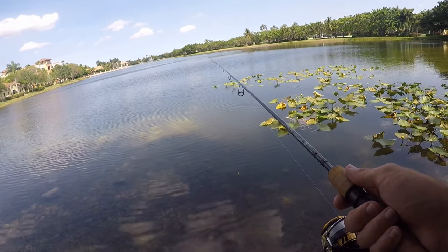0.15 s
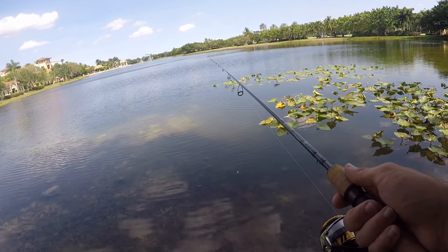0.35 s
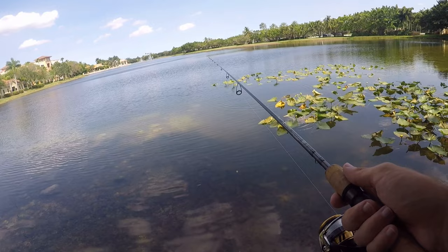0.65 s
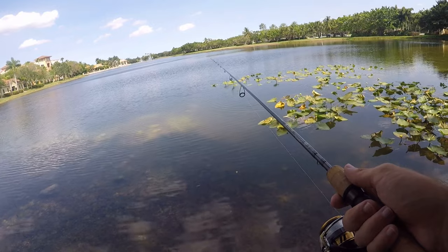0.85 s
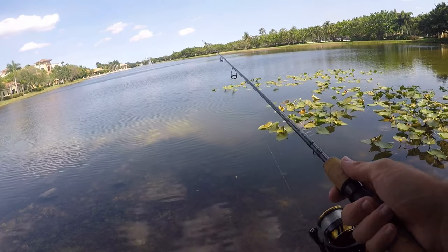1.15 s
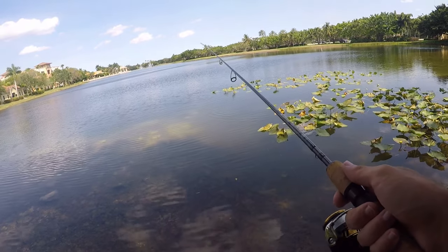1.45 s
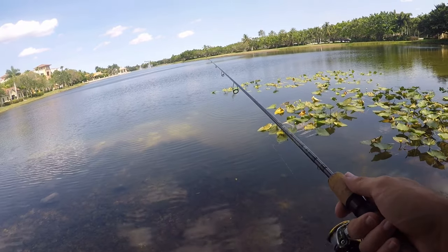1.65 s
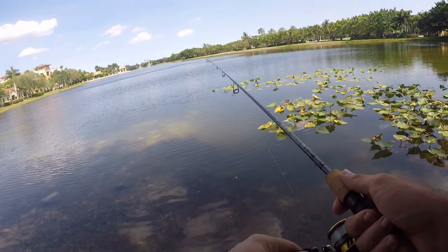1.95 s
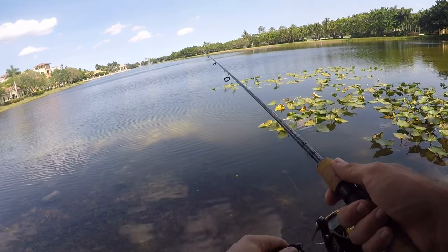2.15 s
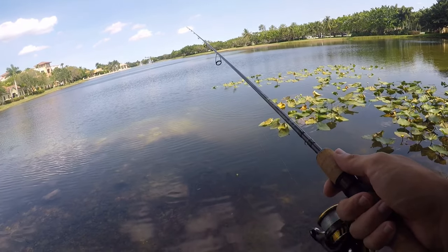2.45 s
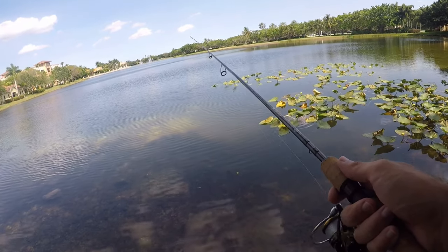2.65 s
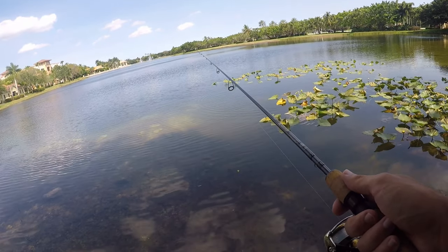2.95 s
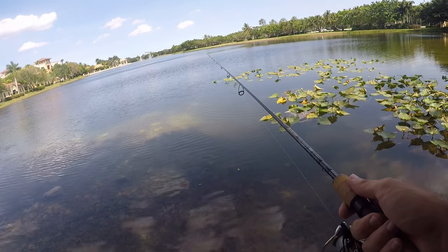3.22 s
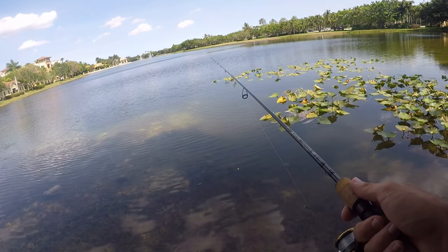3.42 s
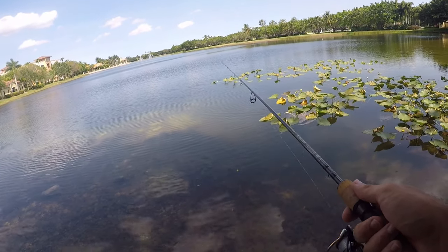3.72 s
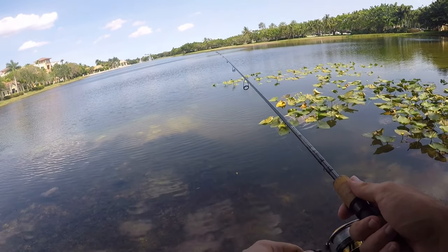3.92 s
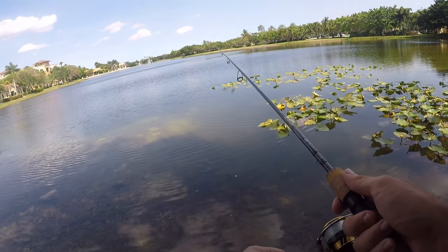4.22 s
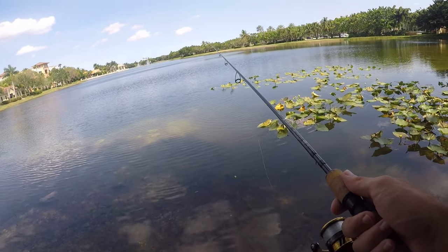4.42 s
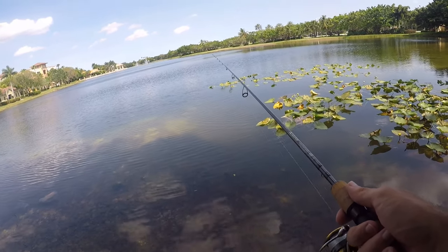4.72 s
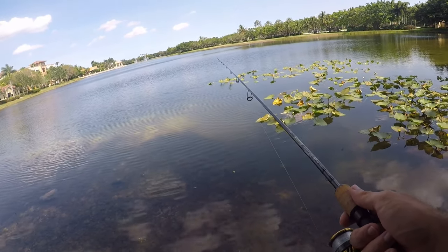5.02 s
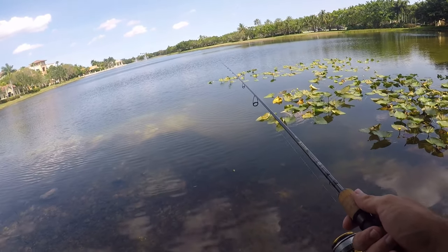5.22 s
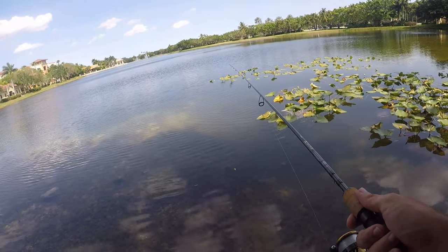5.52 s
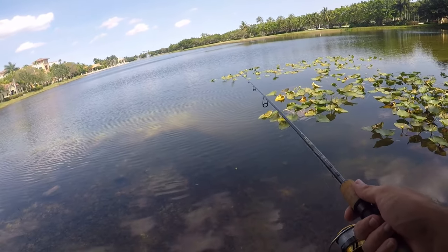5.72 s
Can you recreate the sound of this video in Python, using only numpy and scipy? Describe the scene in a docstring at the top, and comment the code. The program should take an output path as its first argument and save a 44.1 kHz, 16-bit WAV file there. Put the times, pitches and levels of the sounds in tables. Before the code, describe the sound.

Loud low propeller drone sliding downward and fading into a soft boom outdoors, with breathy fluttering roar, faint accelerating car, and two late thuds.

```python
"""A propeller plane drones away over a lake, sinking in pitch: engine tones with the Doppler shift of a straight flight.
Around it noise bands roar, swelling and fading in restless air; far off beyond the trees a car, built from
four engine tones, coasts, then pulls away. Close to a body-worn camera something swishes in a noise band, light wind
rumbles on the two ports as nearly unrelated noise, and decaying sines knock the case. A low rush, hiss and a thin
electronic whine lie beneath."""
import sys
import numpy as np
from scipy import signal
from scipy.fft import rfft, irfft, next_fast_len
from scipy.io import wavfile
from scipy.ndimage import uniform_filter1d

SR = 44100
rng = np.random.default_rng(int(sys.argv[2]) if len(sys.argv) > 2 else 0)


def wrap_up_sound(samples):
    """Save the sound to the file named by the first command line argument, as 16-bit audio."""
    columns = np.atleast_2d(samples).T
    # keep every value between -1 and 1, then stretch to whole-number steps
    tamed = np.clip(columns, -1, 1)
    steps = np.round(tamed * 32767).astype(np.int16)
    wavfile.write(sys.argv[1], SR, steps)


N = 259043
TIME = np.arange(N) / SR  # s

# The plane's straight line, with its engine cycle rate at the source.
CYCLE_HZ, SPEED_M_S, NEAREST_M, NEAREST_S = 19.575, 89.44, 615.2, .453
SOUND_M_S = 343
BLADE_MULTIPLE = 6  # blade passes per engine cycle
# Engine tones of the plane. Each row: the multiples of the cycle rate sharing one level curve.
PLANE_MULTIPLES = [
    [6],
    [12],
    [18],
    [24, 30, 36, 42, 48],
    [9, 16],
    [10, 8, 7, 11],
    [14, 15, 13, 4, 5],
    [29, 23, 35, 32],
    [19, 20, 26, 22],
]
# Balance inside those groups. Each row: offset in dB of each multiple from its curve.
PLANE_OFFSETS_DB = [
    [0.5],
    [0],
    [-0.5],
    [0, -9.5, -13.5, -18, -17.5],
    [1, -17],
    [-0.5, -2.5, -2, -13],
    [2, -2.5, -7, -9, -10],
    [0.5, -3, -7.5, -11],
    [0, -1.5, -4, -6.5],
]
# The propeller beams sideways and fades as the tail turns to us.
# Each row: time in seconds, then curve level in dB of the blade tone and its 2nd, 3rd and 4th multiple groups.
BLADE_LEVELS = [(0, -11.5, -19, -34.5, -33), (.4, -12.5, -20.5, -23.5, -30), (.7, -12, -26.5, -24.5, -34.5),
                (1.35, -11.5, -27.5, -25.5, -39.5), (1.6, -14, -25.5, -26.5, -44),
                (1.8, -16, -25.5, -32.5, -52), (2.2, -16, -22.5, -29, -54), (2.6, -17, -22, -32, -62),
                (3, -24.5, -22.5, -52, -39.5), (3.25, -21, -26.5, -59, -48), (3.55, -33, -31.5, -39, -47),
                (3.8, -26, -48, -43, -45), (4, -28.5, -32, -44, -48), (4.2, -34.5, -38.5, -42, -58),
                (4.7, -32, -28, -39, -44.5), (5.15, -38, -25, -42.5, -64), (5.4, -33, -23.5, -35, -64),
                (5.87, -33, -20.5, -40, -53)]
# The exhaust points backwards, its boom growing.
# Each row: time in seconds, then curve level in dB of boom, rumble, growl, buzz and rasp.
EXHAUST_LEVELS = [(0, -46, -43, -41, -56, -44.5), (.6, -45, -38.5, -39, -56, -42),
                  (1.1, -32, -35, -37, -58, -46), (1.45, -30.5, -39.5, -36.5, -60, -53),
                  (1.9, -30, -45, -39, -58, -57), (2.2, -27, -43, -34, -45.5, -46),
                  (2.55, -23, -33.5, -31, -40, -42), (3, -24.5, -33, -35, -38.5, -42.5),
                  (3.2, -25.5, -33.5, -35.5, -52, -52), (3.4, -21.5, -32.5, -36.5, -43.5, -48),
                  (3.6, -26.5, -33.5, -34.5, -43, -45), (3.85, -22.5, -33.5, -37, -50, -50.5),
                  (4.4, -21, -32, -37, -50, -50), (5.2, -24, -27, -45, -52, -52),
                  (5.45, -26, -30, -49, -43, -48), (5.6, -22.5, -30, -48, -43.5, -48),
                  (5.87, -22, -32, -50, -43.5, -47)]
# Pulses arrive smeared while the plane is high, sharp once it is far.
# Each row: time in seconds, phase bend in rad per squared blade multiple away from the 2nd.
PULSE_SMEAR = [(0, 2), (.5, 1.9), (1.8, -.3), (5.87, -.3)]
# Each passing blade chops the roar, less so from afar. Each row: time in seconds, depth from 0 to 1.
BLADE_CHOP = [(0, .35), (2.5, .2), (4, .05), (5.87, .05)]

# Colours of the roar, low to top. Each row: frequency in Hz, relative level in dB per Hz.
LOW_COLOUR = [(300, -30.5), (480, 1), (600, -3.5), (760, -6.5), (960, -3), (1250, -7.5), (1500, -9),
              (2000, -39.5)]
MID_COLOUR = [(1100, -26), (1400, -4), (1780, -2.5), (2150, 0), (2450, -6.5), (2900, -19.5)]
HIGH_COLOUR = [(2300, -17.5), (2700, -2.5), (3340, -1), (3800, -4.5), (4300, -8.5), (4900, -25)]
TOP_COLOUR = [(3800, -23.5), (4400, -3.5), (5000, -1), (5700, -3.5), (6400, -18.5)]
# Low, middle, high and top roar, then the swish.
# Each row: place in octaves above 1 kHz, level in dB between swells at 0 s, change in dB per second.
AIR_BANDS = [(-.4, -37.5, -.89), (.85, -46, -.27), (1.7, -53.5, -0.25), (2.3, -58.5, -1.2),
             (2.7, -58.5, -0.51)]
# Moments when the air carries better.
# Each row: centre in seconds, half length in seconds, rise in dB, centre and spread in octaves above 1 kHz.
AIR_SWELLS = [(0.037, 0.115, 8.5, 3.0, 1.92), (0.279, 0.091, 4.3, 1.9, 2.7),
              (0.383, 0.072, 3.4, -0.7, 0.42), (0.447, 0.101, 9.4, 1.86, 0.84),
              (0.569, 0.16, 8.4, 0.14, 0.6), (0.667, 0.024, 5.4, 1.5, 0.44), (0.85, 0.02, 4.0, 2.3, 0.4),
              (0.879, 0.096, 3.2, 0.7, 1.4), (0.999, 0.044, 6.4, 1.78, 1.46), (1.143, 0.085, 9, 0.8, 2.4),
              (1.213, 0.026, 5.5, 2, 0.4), (1.57, 0.035, 11.8, 0.2, 0.57), (1.661, 0.18, 5.4, 1.3, 1),
              (1.768, 0.044, 9.0, 3.0, 1.96), (2.073, 0.07, 3.4, 0.8, 1.9), (2.251, 0.037, 5.4, 1.76, 0.58),
              (2.345, 0.145, 7.8, 0.2, 2.07), (2.46, 0.12, 8.5, 2.13, 0.65), (2.658, 0.071, 7.9, -0.3, 2.4),
              (2.666, 0.022, 8.1, 2.3, 0.5), (2.861, 0.16, 6.5, 0.6, 2), (3.016, 0.031, 6.5, 0.5, 0.9),
              (3.158, 0.11, 6, 1.2, 0.55), (3.315, 0.16, 11, 3, 0.79), (3.563, 0.11, 4.8, 1.8, 2.48),
              (3.7, 0.052, 6.3, 0.3, 0.73), (4.118, 0.13, 11.3, 2.55, 0.4), (4.178, 0.12, 4.9, 0.3, 0.82),
              (4.639, 0.12, 4.4, 0.6, 1.3), (5.08, 0.101, 5.9, 0.9, 0.71), (5.522, 0.16, 8.8, 0.12, 0.48)]
FLUTTER_DB_PER_OCTAVE = 0.32
ECHO_S, ECHO_DB = 0.002874, -20.5  # the roar again, off the wearer's body

# The car's engine. Each row: time in seconds, cycle rate in Hz.
CAR_CYCLE = [(0, 16.85), (.8, 15.8), (1.6, 15), (2.95, 13.5), (3.2, 14.3), (3.5, 15.3), (4.1, 18.8),
             (4.7, 23.1), (5, 25.95), (5.15, 26.2), (5.45, 28.5), (5.87, 30.6)]
# Its tones. Each row: one multiple of the cycle rate.
CAR_MULTIPLES = [
    [3],
    [5],
    [2],
    [1],
]
# Each row: offset in dB of that multiple from its level curve.
CAR_OFFSETS_DB = [[0]] * 4
# Strength of the tones in the same order. Each entry: gain in dB.
CAR_GAINS_DB = [0.5, -4, -7.5, -1.5]
# What the pipe lets out. Each row: frequency in Hz, level in dB before gain and load.
PIPE_RESPONSE = [(14, -50), (25, -40), (45, -29.5), (56, -24), (64, -23), (73, -19), (85, -22),
                 (103, -30.5), (118, -20.5), (137, -38), (153, -26)]
# Coasting, then pulling. Each row: time in seconds, load gain in dB, extra gain of the 5th multiple in dB.
LOAD_CURVE = [(0, -6.5, -20), (.5, -5, -20), (1.2, -6, -9), (2, -13.5, -1), (2.85, -10.5, -11),
              (3.1, -5.5, 3), (3.35, 1.5, -4.5), (3.65, -3.5, 4.5), (3.95, 1, 0), (4.25, -2.5, 8),
              (4.5, -1, 2.5), (4.9, 0.5, -0.5), (5.35, -3, -9), (5.6, 1.5, -11), (5.87, -0.5, -2)]

# Colours of the nearer and fainter noises. Each row: frequency in Hz, relative level in dB per Hz.
SWISH_COLOUR = [(4800, -29.5), (5600, -2.5), (6400, -1), (7400, -3), (8200, -18)]
RUMBLE_COLOUR = [(18, -26), (30, -10.5), (50, -7.5), (100, -4), (200, -6.5), (300, -9.5), (450, -16.5),
                 (600, -46.5)]
WIND_COLOUR = [(15, -15), (40, -4), (90, -1), (150, -9.5), (300, -26), (500, -44.5)]
HISS_COLOUR = [(3500, -23.5), (5000, -10.5), (6430, -7), (8000, -5), (10100, -6), (11500, -13),
               (13100, -16), (14400, -31.5)]
# The low rush thins at the end. Each row: time in seconds, level in dB.
RUMBLE_LEVEL = [(0, -31), (2.6, -30), (5.87, -33)]
# Knocks on the case. Each row: start in seconds, level in dB, click gain in dB beside the thud, push in seconds.
CASE_KNOCKS = [(5.702, -6, -30, .012), (5.747, -10.5, -5, .002)]
# Thud, then click of the case. Each row: frequency in Hz, gain in dB, time to fall 60 dB in seconds.
CASE_MODES = [(109, 2.5, 0.14), (520, 4, 0.089)]
# Camera electronics. Each row: frequency in Hz, left level in dB, signed share in the right port.
WHINE_TONES = [(6146, -70, -.45), (6647, -76, .8)]
# How the camera body shades the two ports.
# Each row: frequency in Hz, likeness from 0 to 1, lead of the right in rad, left minus right in dB before port gain.
BODY_PORTS = [(100, 0.94, -0.5, 0.5), (356, 1, 0.23, -1), (530, 0.5, 0, -1), (655, 0.25, 2, 0.5),
              (945, 0.87, 1.5, -0.5), (1500, 0.25, 2.5, -2), (1710, 0.5, 0.7, 6), (2160, 0.3, 0, 1),
              (2860, 0.3, 0.65, -3), (3670, .72, 0.16, -2.5), (4500, 0.5, -0.2, 1), (5750, 0.4, -1.5, 2),
              (8000, 0.05, -3, -2.5), (14000, .18, -2.5, -4)]
# Wind strikes the ports almost separately. Columns as above.
WIND_PORTS = [(20, 0.044, 0, 0.0031), (500, 0.046, 0.0054, 0)]


def undb(db):
    """Amplitude factor for a level in dB."""
    return 10 ** (np.asarray(db) / 20)


def columns(table):
    """Each column of a time curve, sample by sample."""
    seconds, *rest = np.transpose(table)
    return [np.interp(TIME, seconds, column) for column in rest]


def on_log_hz(points, hz, column=1):
    """One column of a frequency table, read along log frequency."""
    points = np.array(points)
    return np.interp(np.log(hz + 1), np.log(points[:, 0]), points[:, column])


def walk(rate):
    """Random levels held 1 / rate s and slewed twice; spread near 1."""
    hold = int(SR / rate)
    steps = np.repeat(rng.standard_normal(N // hold + 1), hold)
    smooth = uniform_filter1d(uniform_filter1d(steps, hold), hold)
    return 1.34 * smooth[:N]


def late(x, count):
    """The same sound, count samples later."""
    silence = np.zeros(x.shape[:-1] + (count,))
    return np.concatenate([silence, x[..., :-count]], axis=-1)


def engine(rate, levels_db, multiples, offsets_db, beat, shimmer_db, waver, smear):
    """Cycle multiples on the beat add up to pulses that rise, then drop steeply; smear drags them apart;
    moving air makes each tone shimmer."""
    turn, out = 2 * np.pi * np.cumsum(rate) / SR, 0
    for curve_db, group, group_db in zip(levels_db, multiples, offsets_db):
        for multiple, offset_db in zip(group, group_db):
            off_beat = multiple % beat > 0  # these start at a random phase
            start = 2 * np.pi * rng.random() * off_beat + smear * (multiple / BLADE_MULTIPLE - 2) ** 2
            phase = multiple * (turn + waver * walk(9)) + start
            level = undb(curve_db + offset_db + shimmer_db * walk(14))
            out = out - np.sqrt(2) * level * np.sin(phase)
    return out, turn


def noise(colour, ports, flicker_db, rate):
    """Two-port noise of rms 1 overall; third-octave bands flicker each on their own."""
    size = next_fast_len(N)
    hz = np.arange(size // 2 + 1) * SR / size
    like, lead, lean_db = (on_log_hz(ports, hz, column=k) for k in range(1, 4))
    like = np.clip(like, 0, 1)
    left, other = rfft(rng.standard_normal((2, size))) * undb(on_log_hz(colour, hz))
    right = like * np.exp(1j * lead) * left + np.sqrt(1 - like ** 2) * other
    pair = np.array([left * undb(lean_db / 2), right * undb(-lean_db / 2)])

    place, out = np.log2(hz + 1) * 3, 0  # in third octaves
    lowest = int(np.log2(colour[0][0]) * 3)
    end = int(np.log2(colour[-1][0]) * 3 + 2)
    for band in range(lowest, end):
        share = np.clip(1 - abs(place - band), 0, 1)  # overlapping triangles
        out = out + irfft(share * pair, size)[:, :N] * undb(flicker_db * walk(rate))
    return out / np.sqrt(np.mean(out ** 2))


def plane_rate():
    """Doppler shift: the heard cycle rate sinks as more of the plane's speed points away from us."""
    along = SPEED_M_S * (TIME - NEAREST_S)
    receding = SPEED_M_S * along / np.hypot(along, NEAREST_M)
    return CYCLE_HZ / (1 + receding / SOUND_M_S)


def plane_drone():
    """Propeller and exhaust tones share one engine cycle; also returns its phase for the blade chop."""
    levels_db = columns(BLADE_LEVELS) + columns(EXHAUST_LEVELS)
    return engine(plane_rate(), levels_db, PLANE_MULTIPLES, PLANE_OFFSETS_DB,
                  beat=3, shimmer_db=.45, waver=.007, smear=columns(PULSE_SMEAR)[0])


def air_levels():
    """Each band drifts steadily down and flutters; swells lift the bands near their centre."""
    out, flutter = [], walk(24.01)
    for place, start_db, per_s in AIR_BANDS:
        db = start_db + per_s * TIME + FLUTTER_DB_PER_OCTAVE * (place + 1) * flutter
        for moment, half, rise_db, centre, spread in AIR_SWELLS:
            in_time = ((TIME - moment) / half) ** 2
            in_pitch = ((place - centre) / spread) ** 2
            db = db + rise_db * np.exp(-in_time - in_pitch)
        out.append(db)
    return out


def chopped_roar(levels_db, turn):
    """Four noise bands ride the air, pulse at the blade rate and return faintly off the wearer's body."""
    low_db, mid_db, high_db, top_db = levels_db
    roar = undb(low_db) * noise(LOW_COLOUR, BODY_PORTS, flicker_db=1.6, rate=13)
    roar += undb(mid_db) * noise(MID_COLOUR, BODY_PORTS, flicker_db=1.0, rate=9.8)
    roar += undb(high_db) * noise(HIGH_COLOUR, BODY_PORTS, flicker_db=2.0, rate=11)
    roar += undb(top_db) * noise(TOP_COLOUR, BODY_PORTS, flicker_db=1.0, rate=11)
    roar = roar * (1 + columns(BLADE_CHOP)[0] * np.sin(BLADE_MULTIPLE * turn))
    return roar + undb(ECHO_DB) * late(roar, count=int(ECHO_S * SR))


def car_levels(rate):
    """Each tone is as loud as the pipe lets it out at its pitch, more under load."""
    load_db, fifth_db = columns(LOAD_CURVE)
    out = []
    for (multiple,), gain_db in zip(CAR_MULTIPLES, CAR_GAINS_DB):
        pipe_db = on_log_hz(PIPE_RESPONSE, multiple * rate)
        out.append(pipe_db + gain_db + load_db + (multiple == 5) * fifth_db)
    return out


def distant_car():
    """Four engine tones sink as the car coasts and climb as it pulls away."""
    rate = columns(CAR_CYCLE)[0]
    car, _ = engine(rate, car_levels(rate), CAR_MULTIPLES, CAR_OFFSETS_DB,
                    beat=1, shimmer_db=.8, waver=.03, smear=0)
    return car


def close_swish(level_db):
    """A bright noise band close by, its level following the band curve it is given."""
    return undb(level_db) * noise(SWISH_COLOUR, BODY_PORTS, flicker_db=0.73, rate=16)


def case_knocks():
    """The case rings and moves the two ports against each other; a soft push lets the ring grow slowly."""
    out = np.zeros(N)
    for start, db, click_db, push in CASE_KNOCKS:
        t = np.maximum(TIME - start, 0)
        for (hz, mode_db, t60), extra_db in zip(CASE_MODES, (0, click_db)):
            envelope = 1000. ** (-t / t60) * (1 - np.exp(-t / push))
            out += undb(db + mode_db + extra_db) * np.sin(2 * np.pi * hz * t) * envelope
    return out * np.array([[.6], [-1]])


def port_wind():
    """Light wind: low noise, nearly unrelated at the two ports, in random gusts."""
    gust = undb(5 * walk(9))
    return gust * undb(-33.5) * noise(WIND_COLOUR, WIND_PORTS, flicker_db=3.0, rate=4.6)


def low_rush():
    """Low noise of the plane over far traffic, thinning as the plane leaves."""
    return undb(columns(RUMBLE_LEVEL)[0]) * noise(RUMBLE_COLOUR, BODY_PORTS, flicker_db=1, rate=6)


def background_hiss():
    """A faint high noise bed with small random flickers."""
    return undb(-57) * noise(HISS_COLOUR, BODY_PORTS, flicker_db=1.1, rate=12)


def camera_whine():
    """Steady sines of the camera electronics, unequal at the two ports."""
    out = 0
    for hz, db, right_share in WHINE_TONES:
        out = out + undb(db) * np.sin(2 * np.pi * hz * TIME) * np.array([[1], [right_share]])
    return out


def scene():
    """Plane and car in the distance, the air between, then what sounds at the camera."""
    drone, turn = plane_drone()
    car = distant_car()
    # the drone reaches the right port 6 samples earlier
    tones = np.array([late(drone, count=6) + car, drone + car])
    *roar_db, swish_db = air_levels()
    far = tones + chopped_roar(roar_db, turn) + low_rush()
    near = close_swish(swish_db) + case_knocks() + port_wind()
    return far + near + background_hiss() + camera_whine()


def record(dry):
    """The left port is a little more sensitive; a steep low-pass cuts the top."""
    ports = undb(np.array([[1.2], [-1.2]]))
    low_pass = signal.ellip(8, .2, 70, 14200, fs=SR, output="sos")  # ripple dB, stop dB, edge Hz
    return signal.sosfilt(low_pass, ports * dry)


dry = scene()
out = record(dry)
wrap_up_sound(out)
```